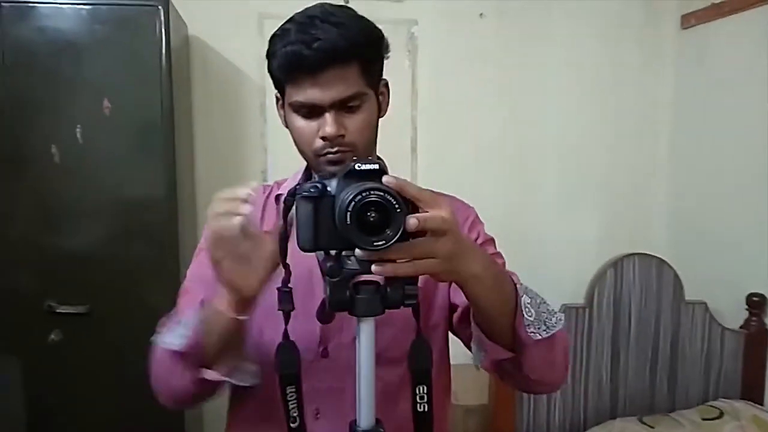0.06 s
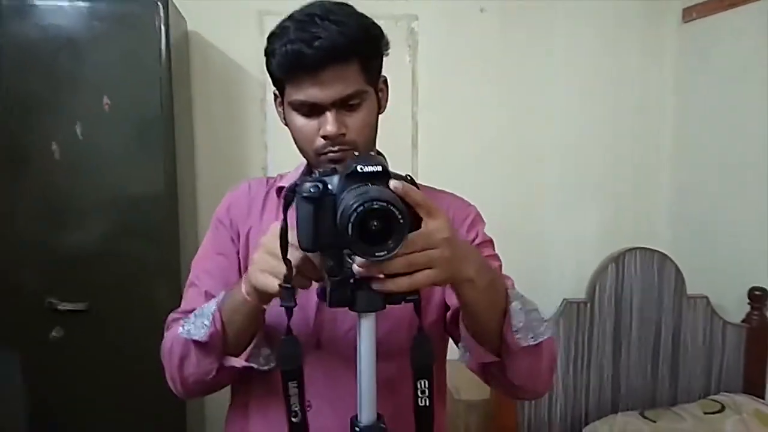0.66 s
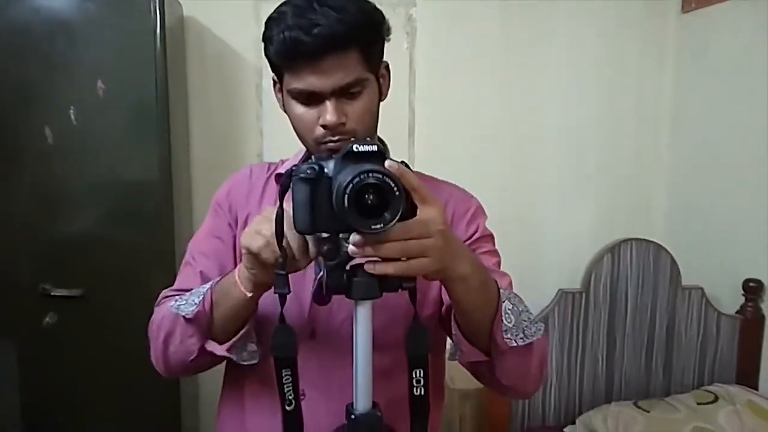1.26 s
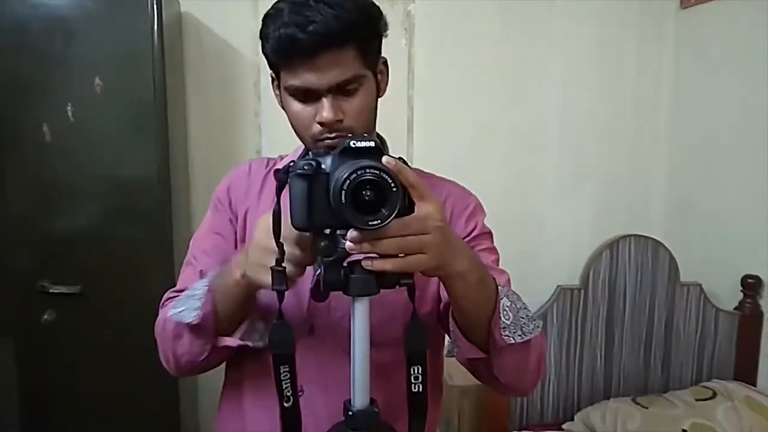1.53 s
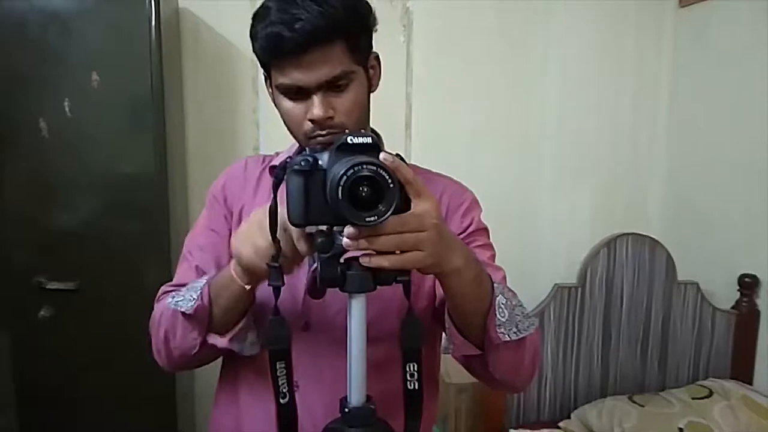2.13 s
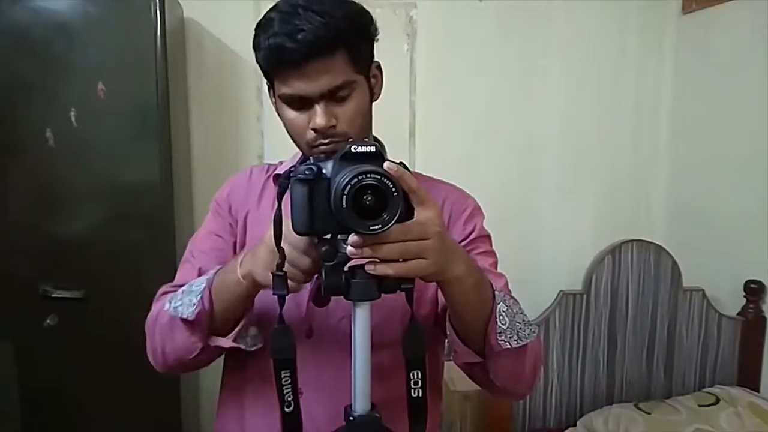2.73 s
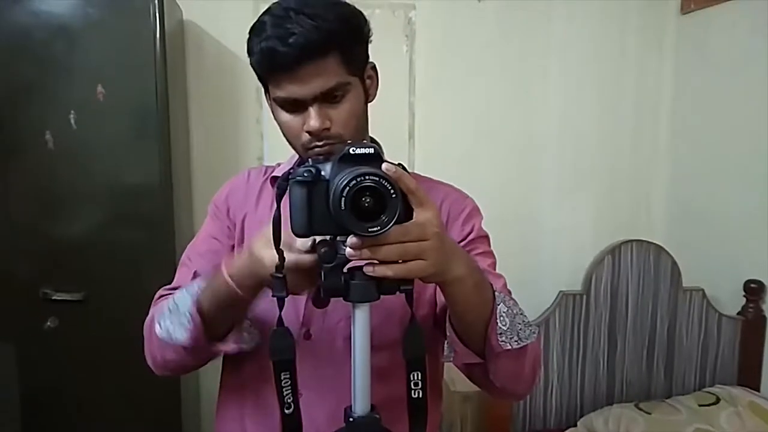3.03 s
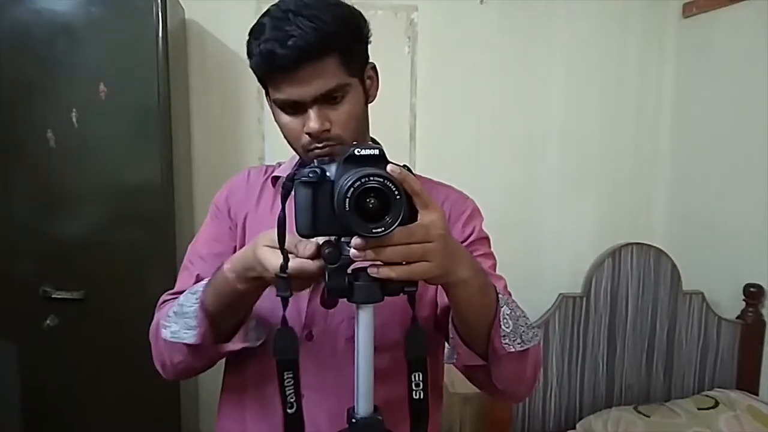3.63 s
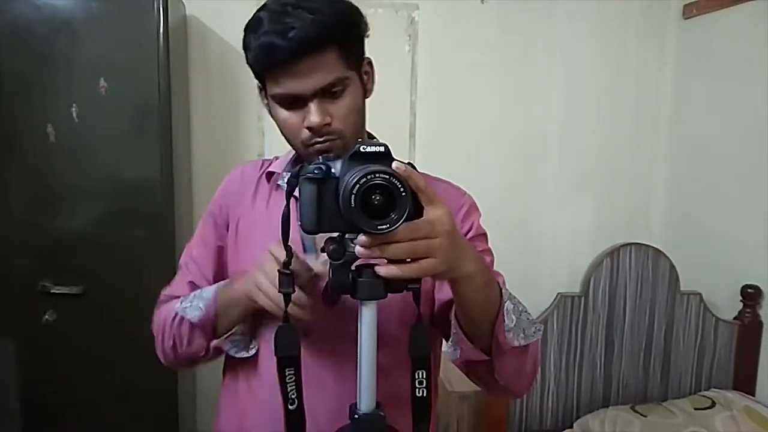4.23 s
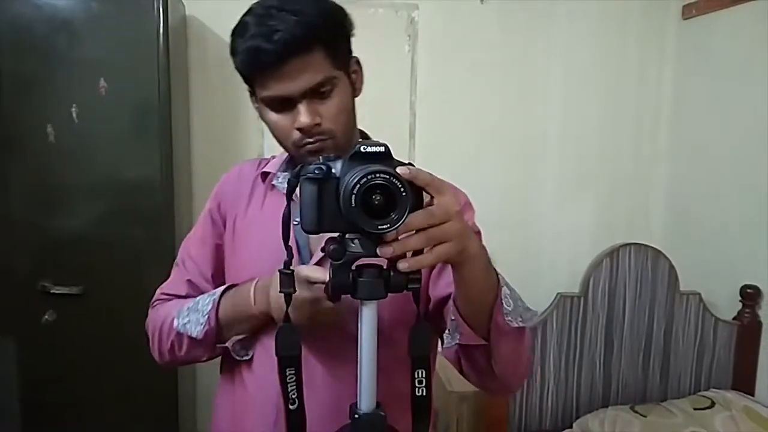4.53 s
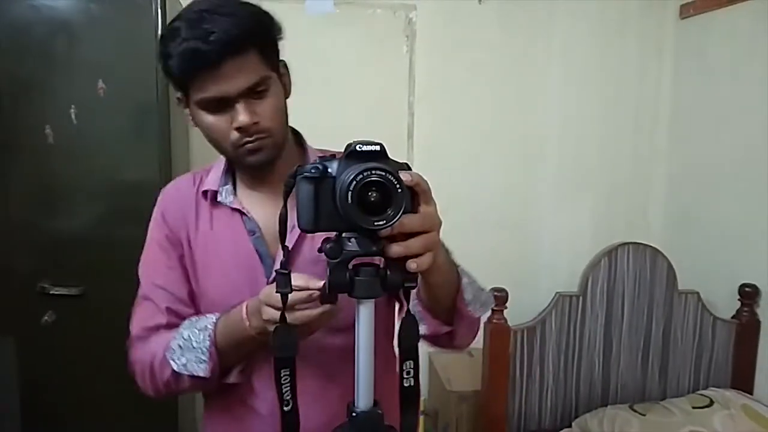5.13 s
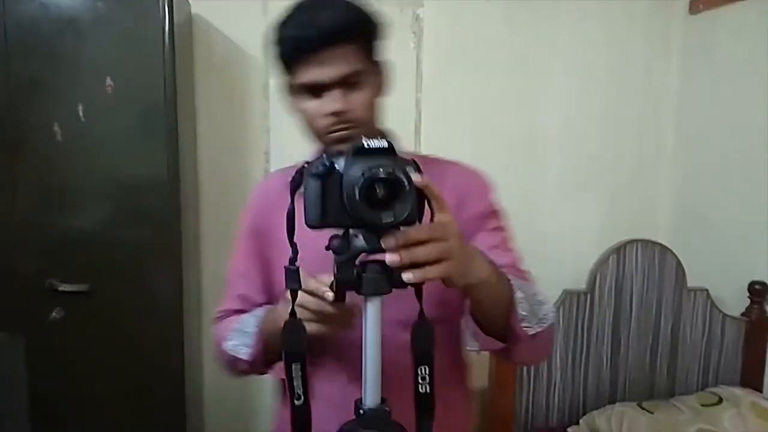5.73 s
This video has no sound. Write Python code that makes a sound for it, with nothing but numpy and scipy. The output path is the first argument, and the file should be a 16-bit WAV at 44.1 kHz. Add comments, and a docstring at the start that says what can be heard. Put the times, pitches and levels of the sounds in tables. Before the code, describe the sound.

Low, uneven thumps and flutter start at once as a ceiling fan blows on a phone's microphone in a small bedroom. The fan's motor hums underneath, throbbing quickly over a soft steady hiss; the hum is strongest around 0.75 seconds and weaker after 3. The wind is the loudest sound, peaking near 1.9 and 2.6 seconds, mostly on the left. Nearby, fingers and fittings tick faintly as a camera is fitted on a tripod, at about 0.7, 1.5 and 2.5 seconds. The wind drops around 3 seconds, and at 3.2 the lock gives a few small metallic clicks and a faint, sinking squeak. Gusts return from 3.8 seconds, with a strong thump near 4.9, and flutter on to the end. A finger lightly brushes the camera at 5.1 seconds, and at 5.5 something slides over it with a short, high hiss.

```python
"""Low thumps and flutter come first: in a small bedroom, a ceiling fan blows on a phone's two microphone
openings (ports). The fan's motor hums over a soft hiss, throbbing as the blades pass.
Nearby, a camera is fitted on a tripod: fingers and fittings tick, then the lock clicks and squeaks
faintly. Near the end a finger brushes the camera, and something slides over it with a short hiss."""
import sys
import numpy as np
from scipy import signal
from scipy.fft import rfft, irfft, next_fast_len
from scipy.io import wavfile
from scipy.ndimage import uniform_filter1d, map_coordinates

SR = 44100
rng = np.random.default_rng(int(sys.argv[2]) if len(sys.argv) > 2 else 0)


def digitize_waveform(pressure):
    """Quantize a signal to 16-bit integers and store it at the path in sys.argv[1].

    Rows of a 2-D input are taken as channels; values are limited to [-1, 1].
    """
    field = np.atleast_2d(pressure).T
    bounded = np.clip(field, -1, 1)
    quanta = np.round(bounded * 32767).astype(np.int16)
    wavfile.write(sys.argv[1], SR, quanta)


N = 254456
TIME_S = np.arange(N) / SR


def amp(db):
    """Turn decibels into a number to multiply by."""
    return 10 ** (np.asarray(db) / 20)


def unit(x):
    """Scale a sound to an average (rms) strength of 1."""
    return x / np.sqrt(np.mean(x ** 2) + 1e-20)


def curves(rows):
    """Join timed points with straight lines: one curve for each column after the time."""
    times_s, *columns = np.transpose(rows)
    return [np.interp(TIME_S, times_s, column) for column in columns]


def wobble(rate):
    """A smooth curve through `rate` random values a second."""
    points = rng.standard_normal(int(N * rate / SR) + 4)
    return map_coordinates(points, [np.arange(N) * rate / SR])


def filtered(x, gain_at):
    """Turn each frequency up or down by gain_at(hz)."""
    size = next_fast_len(N + SR // 2)
    return irfft(rfft(x, size) * gain_at(np.fft.rfftfreq(size, 1 / SR)), size)[..., :N]


def noise(spectrum):
    """Two unrelated noises, shaped by rows of pitch_hz, level_db."""
    pitch_hz, level_db = np.transpose(spectrum)
    shape = lambda hz: amp(np.interp(np.log(hz + 1), np.log(pitch_hz), level_db))
    return unit(filtered(rng.standard_normal((2, N)), shape))


def resonant(modes):
    """Two unrelated noises that ring at rows of pitch_hz, width_hz, level_db."""
    shape = lambda hz: sum(amp(db) / (1 + (2 * (hz - pitch) / width) ** 2) for pitch, width, db in modes)
    return unit(filtered(rng.standard_normal((2, N)), shape))


def placed(pair, left_db, alike=0):
    """Blend two channels (alike: 0 apart, 1 the same) and favour the left by left_db."""
    turn = np.arccos(np.clip(alike, 0, 1)) / 2
    mid, side = np.cos(turn) * pair[0], np.sin(turn) * pair[1]
    return np.array([mid + side, mid - side]) * amp([[left_db / 2], [-left_db / 2]])


def evened(x, span_s, share):
    """Take a share of the slow swings in loudness out of a noise."""
    power = np.abs(uniform_filter1d(x ** 2, int(span_s * SR), axis=-1)) + 1e-6
    return unit(x / power ** (share / 2))


def ringing_note(pitch_hz, width_hz):
    """A nearly even note whose pitch wanders within its width."""
    return evened(resonant([(pitch_hz, width_hz, 0)]), span_s=.006, share=.8)


def struck(start_s, fade_s, rise_s=.0014):
    """The loudness of a tap: a quick rise, then a fall of 60 dB in fade_s."""
    age_s = np.clip(TIME_S - start_s, 0, 1)
    return (1 - np.exp(-age_s / rise_s)) * amp(-60 * age_s / fade_s)


def dulled(x, edge_hz, steepness=30):
    """Cut the treble above an edge that moves over time."""
    hz, frames_s, spectra = signal.stft(x, SR, nperseg=128)
    edge = np.maximum(np.interp(frames_s, TIME_S, edge_hz), SR / 10)
    return signal.istft(spectra / np.sqrt(1 + (hz[:, None] / edge) ** steepness), SR)[1][:, :N]


# Gusts from the fan: start_s, hold_s, level_db, fall_s (to drop 20 dB), port (0 left, 1 right)
GUSTS = [(0, .12, -32, .33, 0), (0, .1, -28.5, .12, 1), (.17, .1, -46, .3, 1), (.51, .03, -47, .15, 0),
         (.5, .15, -52, .3, 1), (.79, .12, -52, .2, 1), (1.02, .08, -42, .5, 1), (1.35, .27, -41, .22, 1),
         (1.37, .01, -47, .1, 0), (1.45, .05, -38.5, .12, 0), (1.59, .06, -38, .1, 0),
         (1.67, .14, -31, .2, 0), (1.72, .45, -44.5, .25, 1), (1.82, .155, -23.3, .07, 0),
         (1.99, .04, -32, .25, 0), (2.23, .11, -37, .25, 0), (2.31, .13, -36.5, .4, 1),
         (2.575, .065, -22.5, .07, 0), (2.55, .1, -41, .2, 1), (2.75, .29, -48, .15, 1),
         (2.67, .12, -38, .12, 0), (2.9, .2, -52, .08, 0), (3.4, .02, -50, .06, 1),
         (3.52, .02, -53, .18, 1), (3.82, .29, -41.5, .2, 1), (4.02, .07, -40.5, .13, 0),
         (4.32, .03, -44, .17, 0), (4.37, .2, -52, .2, 1), (4.67, .05, -37, .13, 0),
         (4.67, .15, -43, .5, 1), (4.845, .02, -31, .05, 0), (4.872, .02, -26, .05, 0),
         (4.9, .05, -38, .1, 0), (4.97, .08, -31, .08, 0), (5.07, .12, -44, .2, 0), (5.31, .42, -39, .2, 0),
         (5.35, .13, -41, .22, 1)]
def gust_levels(calm_db=-72, rise_s=.06):
    """The draught's strength in dB at each port: every gust rises quickly, holds and dies away."""
    power = np.full((2, N), amp(calm_db) ** 2)
    for start_s, hold_s, level_db, fall_s, port in GUSTS:
        before = np.maximum(start_s - TIME_S, 0) / rise_s
        after = np.maximum(TIME_S - start_s - hold_s, 0) / fall_s
        power[port] += amp(level_db - 20 * np.minimum(before + after, 10)) ** 2
    return 10 * np.log10(power)


# The deep rumble of slow air: pitch_hz, level_db
SLOW_AIR = [(10, -24), (25, -13), (45, -3), (75, -1.5), (120, -1.5), (165, -9.5), (220, -20.5),
            (320, -41.5), (600, -70.5), (1200, -120)]
# The higher rumble of fast air: pitch_hz, level_db
FAST_AIR = [(30, -25.5), (90, -11), (150, 4), (200, -3), (260, 0), (350, -8), (450, -14), (550, -32),
            (700, -52), (1400, -110)]
def flutter(flow_db):
    """Air churns unevenly at each port; a stronger flow brings smaller, faster swirls."""
    slow = evened(noise(SLOW_AIR), span_s=.03, share=.8)
    fast = evened(noise(FAST_AIR), span_s=.02, share=.9)
    fast_db = np.minimum(1.4 * (flow_db + 18.5), -2)
    lumps_db = 2.4 * np.array([wobble(45), wobble(45)])
    return amp(flow_db - 1.8) * (amp(lumps_db) * slow + amp(fast_db) * fast)


def small_swirls(flow_db, per_second=13, typical_hz=84):
    """List random swirls of air at each port, about as strong as the gust that carries them."""
    rows = []
    for k, (late, size, speed) in enumerate(rng.standard_normal((300, 3))):
        time_s, port = (k // 2 + late / 2) / per_second, k % 2
        if 0 <= time_s * SR < N:
            level_db = flow_db[port, int(time_s * SR)] + 2 + 2.3 * size
            rows.append((time_s, level_db, typical_hz * np.exp(.1 * speed), .55, port))
    return rows


# The loudest swirls: time_s, level_db, pitch_hz, half_length_cycles, port (0 left, 1 right)
BIG_SWIRLS = [(.059, -18, 110, .65, 0), (.08, -19, 125, .7, 0), (.083, -24, 220, .8, 0),
              (.097, -16, 120, .65, 1), (.142, -18, 108, .52, 0), (.193, -26, 110, .45, 0),
              (.243, -29, 90, .5, 1), (.312, -26, 102, .55, 0), (.805, -39, 90, .55, 1),
              (.903, -30.5, 92, .55, 1), (.973, -32, 90, .55, 1), (1.048, -29, 90, .55, 1),
              (1.093, -31, 90, .5, 1), (1.301, -23, 90, .8, 1), (1.39, -29, 85, .5, 1),
              (1.487, -26, 105, .7, 1), (1.55, -24, 90, .6, 1), (1.595, -26, 89, .55, 1),
              (1.673, -13, 100, .6, 0), (1.687, -18, 105, .5, 0), (1.716, -15, 125, .45, 0),
              (1.771, -14, 115, .5, 0), (1.823, -9.5, 208, .42, 0), (1.832, -29, 90, .6, 1),
              (1.843, -14, 290, .8, 0), (1.855, -9, 135, .35, 0), (1.874, -20, 290, .7, 0),
              (1.891, -8, 120, .6, 0), (1.907, -8.7, 180, .7, 0), (1.923, -16, 140, .5, 0),
              (1.931, -22, 80, .55, 1), (1.94, -12, 85, .55, 0), (1.952, -11, 200, .5, 0),
              (1.963, -16, 220, .5, 0), (1.981, -20.5, 220, .55, 0), (2.026, -23, 95, .5, 0),
              (2.204, -12, 102, .6, 0), (2.31, -25, 85, .6, 0), (2.42, -27, 80, .6, 1),
              (2.54, -21, 90, .55, 0), (2.556, -16, 130, .5, 0), (2.572, -13, 245, .65, 0),
              (2.58, -9, 135, .5, 0), (2.594, -7.3, 121, .55, 0), (2.607, -18, 310, .7, 0),
              (2.609, -12, 140, .6, 0), (2.622, -9.8, 130, .7, 0), (2.633, -16, 255, .8, 0),
              (2.64, -6.3, 95, .6, 0), (2.667, -19, 135, .6, 0), (3.896, -32, 76, .6, 1),
              (3.963, -33, 85, .6, 1), (4.06, -30.5, 100, .8, 0), (4.133, -28, 97, .55, 1),
              (4.425, -38, 90, .55, 1), (4.652, -26, 90, .6, 0), (4.683, -25, 100, .55, 0),
              (4.843, -14.5, 140, .36, 0), (4.86, -22, 110, .5, 0), (4.882, -9.5, 120, .72, 0),
              (4.974, -18, 115, .7, 0), (5.051, -16.5, 115, .35, 0), (5.172, -23.5, 85, .55, 0),
              (5.311, -25, 79, .55, 0), (5.455, -26, 85, .55, 0), (5.489, -26, 90, .55, 0),
              (5.558, -26, 70, .5, 0), (5.601, -25, 70, .45, 0), (5.742, -25, 80, .5, 0)]
def thumps(flow_db):
    """Each swirl hits a port with one swing of pressure, shorter the faster it passes."""
    swirls = BIG_SWIRLS + small_swirls(flow_db)
    phases = rng.uniform(0, 2 * np.pi, size=400)
    pressure = np.zeros((2, N))
    for (time_s, level_db, pitch_hz, half_length, port), phase in zip(swirls, phases):
        reach_s = np.pi * half_length / pitch_hz
        near = slice(*np.searchsorted(TIME_S, [time_s - reach_s, time_s + reach_s]))
        cycles = (TIME_S[near] - time_s) * pitch_hz
        swell = amp(level_db) * np.exp(-(cycles / half_length) ** 2)
        pressure[port, near] += swell * np.cos(2 * np.pi * cycles + phase)
    return pressure


# The fixed tone colour of the wind rumble at the microphones: pitch_hz, gain_db
WIND_COLOUR = [(20, -4.5), (40, -0.5), (60, 0), (130, 0.5), (165, 0), (200, -1), (255, 3), (310, -3),
               (350, 0), (450, -0.5), (600, -4.5)]
def draught():
    """The fan's wind flutters and thumps at the microphones, with a fixed tone colour."""
    pitch_hz, gain_db = np.transpose(WIND_COLOUR)
    flow_db = gust_levels()
    wind = flutter(flow_db) + thumps(flow_db)
    return filtered(wind, lambda hz: amp(np.interp(hz, pitch_hz, gain_db)))


# How the hum's loudness moves at each port: time_s, left_db, right_db
HUM_LEVELS = [(0, -51, -63), (.42, -46, -56.5), (.75, -42.5, -51), (1.1, -45, -51.5), (1.35, -50, -52),
              (2.0, -53, -58), (2.45, -63.5, -67.5), (2.76, -55, -61), (2.95, -70, -71), (3.15, -76, -79),
              (3.27, -74, -77), (3.35, -60, -66.5), (3.63, -65.5, -72), (3.88, -73, -81), (4.02, -63, -68),
              (4.15, -72, -78), (4.6, -71.5, -78), (5.2, -60, -71), (5.45, -67.5, -73), (5.7, -57.5, -60.5)]
# The hum once the moving blades have scattered it: pitch_hz, level_db
SCATTERED_HUM = [(200, -47.5), (300, -20), (350, -9), (400, -1), (440, -7.5), (495, 0), (525, -9),
                 (570, -33), (800, -81.5)]
# Weak ringing of the running fan: pitch_hz, width_hz, level_db
FAN_RINGS = [(200, 86, 1), (290, 30, -5.5), (364, 49, -3.5), (409, 37, -3.5), (508, 48, -5.5),
             (618.6, 68, -7.5), (741.4, 35, -12), (873.7, 49, -9), (999, 43, -14.5), (1128, 50, -20)]
# Moments when the hum flares up: time_s, extra_db
HUM_FLARES = [(3.192, 14), (3.79, 7), (4.69, 6), (5.58, 7)]
def fan_hum(motor_hz=434.2, slowing_hz_per_s=.8, blade_hz=13.46, flare_s=.025):
    """The motor's tone swells each time a blade passes, and the blades smear part of it in pitch."""
    left_db, right_db = curves(HUM_LEVELS)
    pitch_hz = motor_hz - slowing_hz_per_s * TIME_S
    blade_phase = 2 * np.pi * blade_hz * (TIME_S - .742)
    blade = np.cos(blade_phase)
    depth = np.clip(.24 + .019 * (-45 - left_db), 0, 1)  # a weaker hum throbs more deeply
    # each passing blade throws back an echo of its own strength and bends the pitch
    echo = unit((1 + blade) ** 2) * amp(5 * depth * wobble(blade_hz))
    bend = .15 * wobble(22) - .18 * np.sin(blade_phase)
    tone = np.sqrt(2) * np.sin(2 * np.pi * np.cumsum(pitch_hz) / SR + bend) * amp(wobble(9) - .7)
    scattered = amp(-9.5 + 7 * depth) * placed(noise(SCATTERED_HUM), left_db=-1, alike=.65)
    whirr = amp(-69.7 + .3 * blade) * placed(resonant(FAN_RINGS), left_db=5, alike=1)
    flare_db = sum(db * np.exp(-((TIME_S - time_s) / flare_s) ** 2) for time_s, db in HUM_FLARES)
    throb = 1 - depth + depth * echo
    return amp([left_db + flare_db, right_db + flare_db]) * throb * (tone + scattered) + whirr


# The colour of the background hiss: pitch_hz, level_db
AIR_HISS = [(20, 0), (70, 3), (150, 4), (300, -5), (600, -13.5), (850, -16.5), (1200, -10.5), (1400, -13.5),
            (1620, -10.5), (1780, -14.5), (2400, -19), (3500, -25.5), (6400, -26.5), (6700, -22.5),
            (7650, -21.3), (8000, -25.5), (9400, -23.2), (10300, -24.2), (11000, -28), (11900, -31),
            (12400, -51.5)]
def room_air():
    """Moving air and the microphones make a steady hiss."""
    return amp(-71) * placed(noise(AIR_HISS), left_db=5.5)


# Light taps of fingers and fittings: start_s, level_db, pitch_hz, fade_s
TAPS = [(.716, -66, 1162, .06), (.736, -64, 1190, .09), (1.015, -73, 1187, .12), (1.474, -67, 1640, .1),
        (2.235, -75, 1838, .1), (2.528, -73, 7150, .1), (3.407, -82.5, 13440, .085),
        (4.538, -80, 4600, .06), (4.8, -81, 4680, .08), (4.836, -64, 775, .09), (5.103, -70, 4700, .03),
        (5.119, -76, 4650, .08)]
def ticks(width_hz=60):
    """Each light tap rings a cluster of close pitches."""
    rings = sum(amp(level_db) * struck(start_s, fade_s) * ringing_note(pitch_hz, width_hz)
                for start_s, level_db, pitch_hz, fade_s in TAPS)
    return placed(rings, left_db=6)


# The lock catches twice and rattles: start_s, ring_db, favoured_hz, clack_db, tink_db
LOCK_HITS = [(3.155, -79, 2700, -73, -83), (3.159, -71, 2470, -79, -92), (3.189, -85, 2470, -85, -99),
             (3.217, -79, 2650, -75, -76), (3.2195, -74, 2600, -86, -65), (3.222, -63, 2610, -79, -92),
             (3.236, -80, 2620, -95, -74)]
# The main notes of its metal: pitch_hz, width_hz, level_db
LOCK_NOTES = [(2465, 30, 0), (2610, 60, -11), (2760, 45, -1)]
# Its higher notes, which die sooner: pitch_hz, width_hz, level_db
LOCK_HIGH_NOTES = [(2920, 200, -1), (3240, 150, -4), (4075, 200, -8), (4600, 250, -4), (5300, 160, -.5),
                   (5650, 150, -6), (7000, 300, -8)]
def lock_clicks(ring_s=.13, miss_db_per_hz=.04):
    """Each hit in the loose lock makes a short clack and a high tink, and rings the metal."""
    starts_s, ring_db, favoured_hz, clack_db, tink_db = np.transpose(LOCK_HITS)

    def hits(levels_db, fade_s, rise_s):
        """The loudness of all the hits together."""
        return sum(amp(db) * struck(start_s, fade_s, rise_s) for start_s, db in zip(starts_s, levels_db))

    metal = 0
    for pitch_hz, width_hz, level_db in LOCK_NOTES:
        # a note rings less the further it lies from a hit's favoured pitch
        note_db = level_db + ring_db - miss_db_per_hz * abs(pitch_hz - favoured_hz)
        metal += hits(note_db, ring_s, rise_s=.003) * ringing_note(pitch_hz, width_hz)
    high_notes = hits(clack_db, .65 * ring_s, rise_s=.0014) * resonant(LOCK_HIGH_NOTES)
    clack = hits(clack_db, fade_s=.028, rise_s=.0005) * resonant([(5000, 1300, 0)])
    tink = hits(tink_db, fade_s=.05, rise_s=.0005) * resonant([(11540, 300, 0)])
    return placed(metal + high_notes + clack + tink, left_db=6)


# The path of the squeak: time_s, pitch_hz, level_db
SQUEAK_PATH = [(3.235, 2570, -100), (3.246, 2600, -72), (3.258, 2690, -71), (3.269, 2530, -78),
               (3.279, 2440, -71), (3.305, 2420, -76), (3.322, 2385, -84), (3.36, 2370, -102)]
def lock_squeak(waver_hz=28, rough_db=2):
    """The lock sticks and slips as it is pulled tight: a shaky tone that sinks as it stops."""
    pitch_hz, level_db = curves(SQUEAK_PATH)
    shaky_hz = pitch_hz + waver_hz * np.array([wobble(200), wobble(200)])
    tone = unit(np.sin(2 * np.pi * np.cumsum(shaky_hz, axis=1) / SR))
    sounding = (TIME_S > SQUEAK_PATH[0][0]) & (TIME_S < SQUEAK_PATH[-1][0])
    return sounding * amp(level_db + rough_db * wobble(180)) * placed(tone, left_db=6)


def finger_brush(start_s=5.104, level_db=-76.5, pitch_hz=4150, width_hz=1100, fade_s=.22):
    """Skin rubs on the camera's plastic with a short scuff."""
    scuff = placed(resonant([(pitch_hz, width_hz, 0)]), left_db=6)
    return amp(level_db) * struck(start_s, fade_s) * scuff


# How the slide swells and fades: time_s, level_db
SLIDE_LEVELS = [(5.425, -98), (5.455, -73), (5.485, -57), (5.515, -58), (5.55, -68), (5.58, -78),
                (5.65, -98)]
# The colour of its hiss: pitch_hz, level_db
SLIDE_HISS = [(3000, -43), (5300, -14.5), (6500, -23), (7650, -21), (7850, 1), (9200, 2), (9600, -5),
              (10400, 1), (10850, -12), (11600, -1), (14000, -2), (15600, -4)]
# The thin notes it sets ringing: pitch_hz, width_hz, level_db
SLIDE_NOTES = [(7850, 60, -7), (8550, 60, 0), (8850, 40, -3), (8925, 60, -2), (9130, 60, -1),
               (9200, 50, -1), (9306, 50, 1), (9950, 60, -3), (10130, 50, -3), (10270, 90, -4),
               (10440, 80, -5), (12530, 45, -8)]
def slide(grain_db=2.4, ring_s=.07, top_hz=15900, darken_hz_per_db=160):
    """Fine rubbing makes a high hiss that darkens as it slows, and notes that ring on a little."""
    level_db, = curves(SLIDE_LEVELS)
    stroke = amp(level_db + grain_db * wobble(450))
    power_kept = amp(-60 / (ring_s * SR)) ** 2  # from one sample to the next
    ringing = np.sqrt(signal.lfilter([1 - power_kept], [1, -power_kept], stroke ** 2))
    edge_hz = top_hz + darken_hz_per_db * (level_db - level_db.max())
    hiss = amp(-3.7) * dulled(placed(noise(SLIDE_HISS), left_db=5), edge_hz)
    zing = amp(-8.6) * placed(resonant(SLIDE_NOTES), left_db=14.5)
    return stroke * hiss + ringing * zing


def scene():
    """The fan's wind and hum, the room's hiss and the small sounds of camera and tripod."""
    background = draught() + fan_hum() + room_air()
    return background + ticks() + finger_brush() + lock_clicks() + lock_squeak() + slide()


def record(dry, fade_s=.006, top_hz=15700):
    """Fade the sound in and out, and remove everything above top_hz."""
    from_end_s = np.minimum(TIME_S, TIME_S[::-1])
    fade = np.sin(np.minimum(from_end_s / fade_s, 1) * np.pi / 2) ** 2
    return filtered(dry * fade, lambda hz: hz < top_hz)


dry = scene()
out = record(dry)
digitize_waveform(out)
```